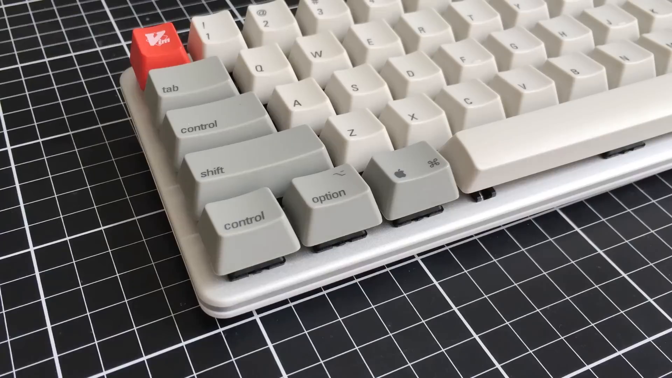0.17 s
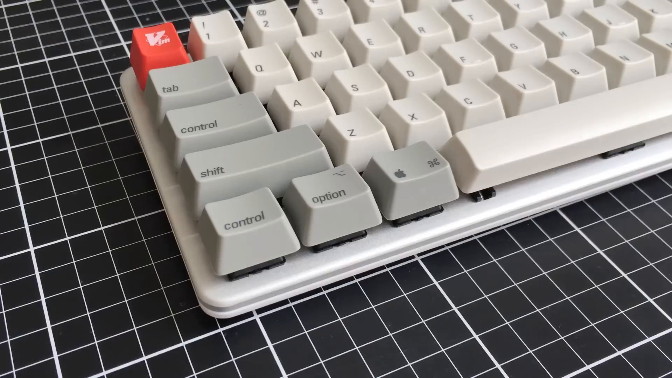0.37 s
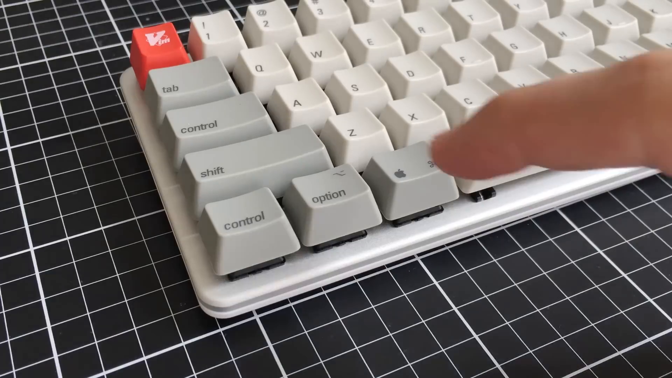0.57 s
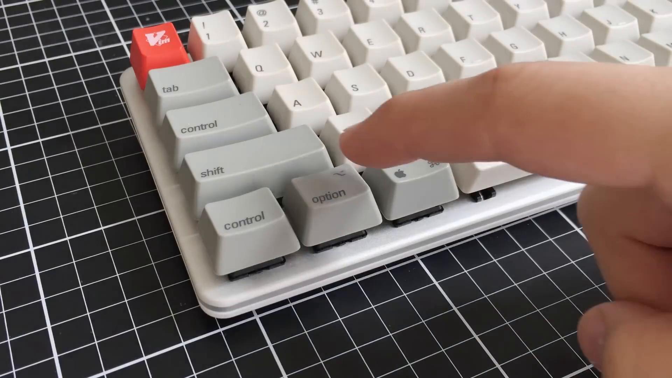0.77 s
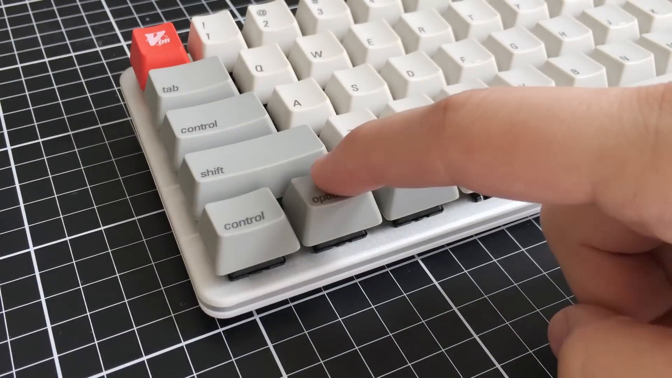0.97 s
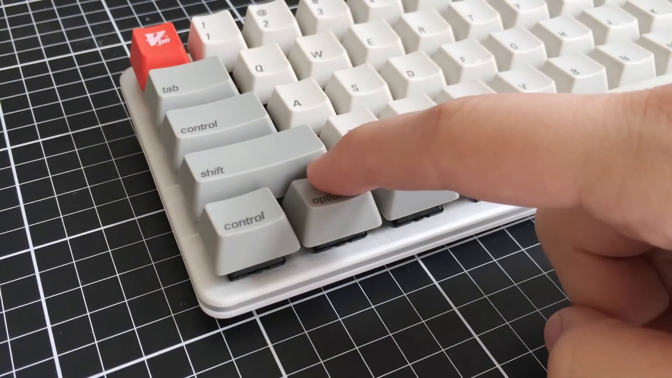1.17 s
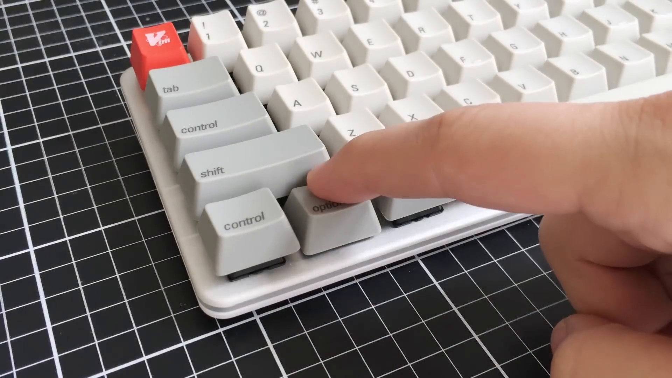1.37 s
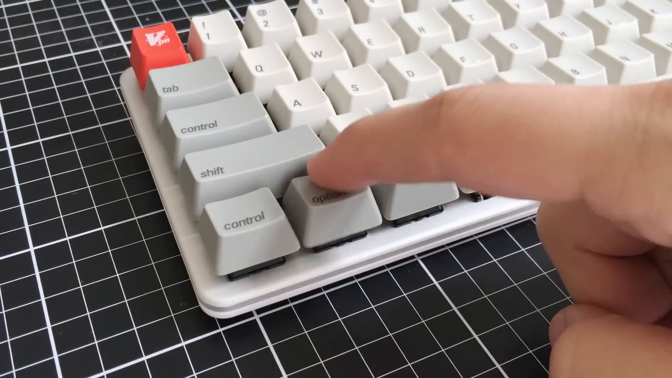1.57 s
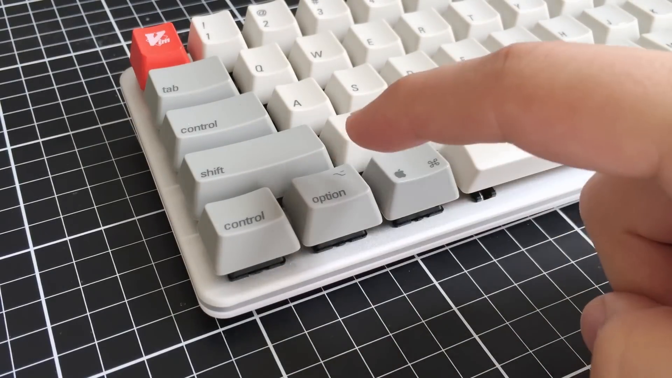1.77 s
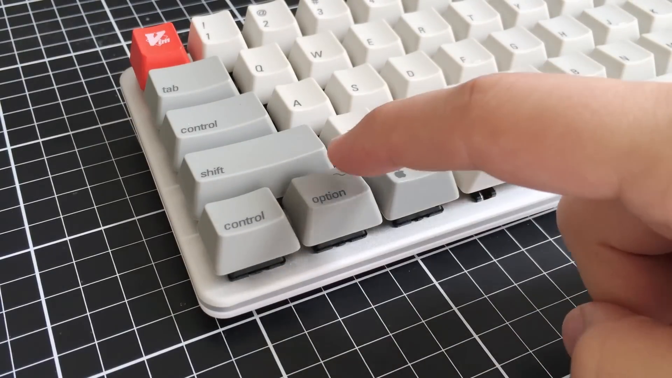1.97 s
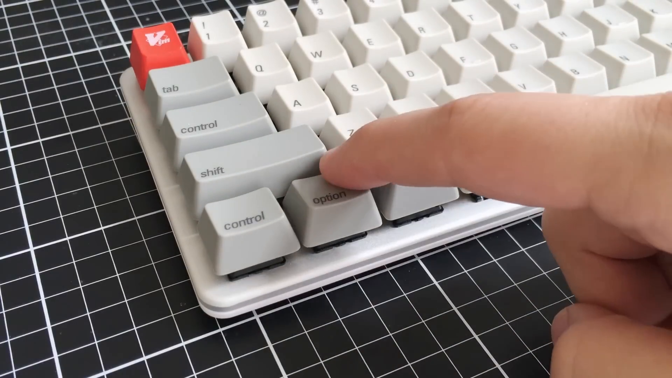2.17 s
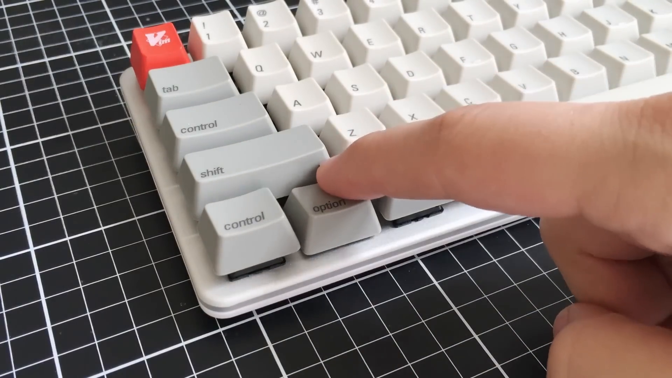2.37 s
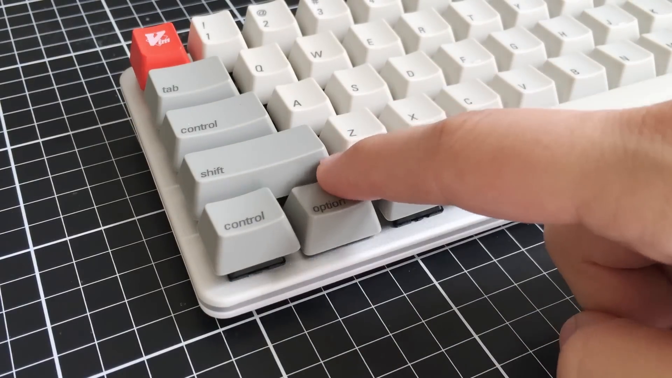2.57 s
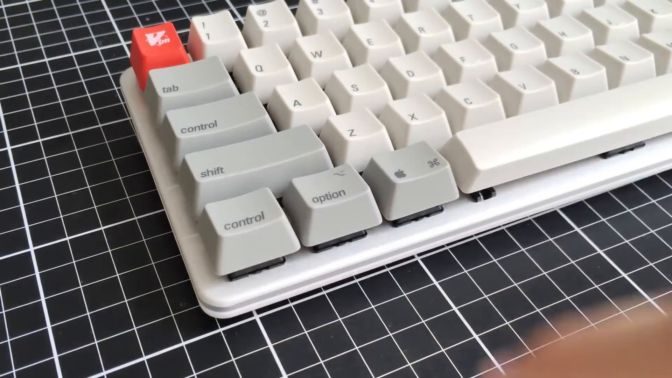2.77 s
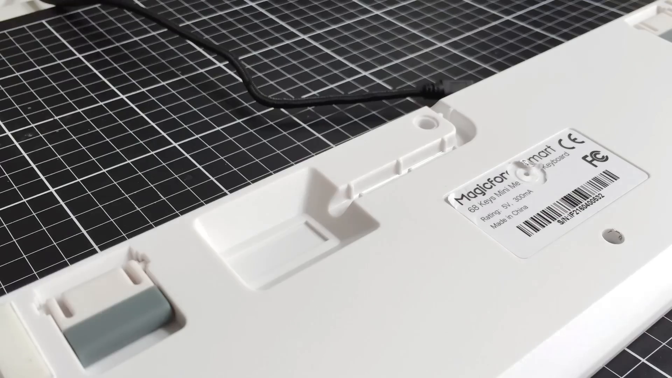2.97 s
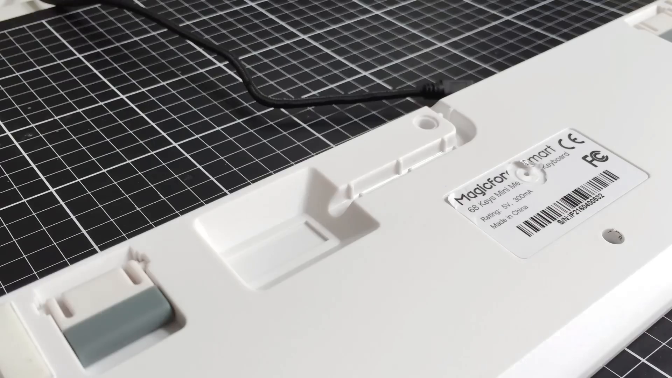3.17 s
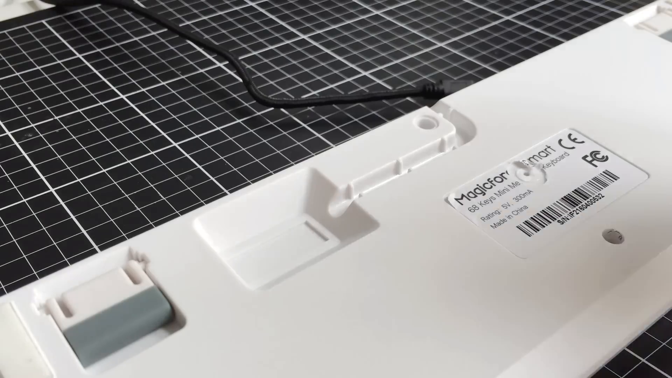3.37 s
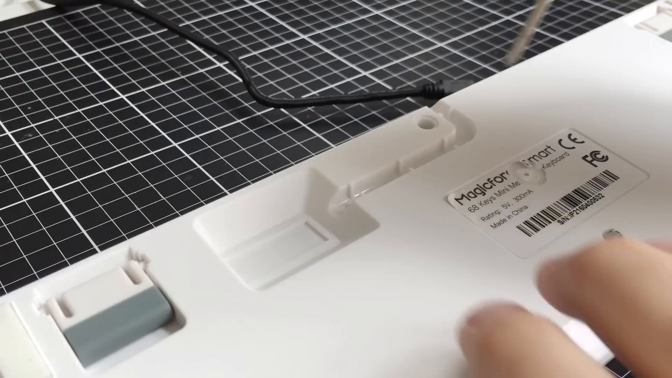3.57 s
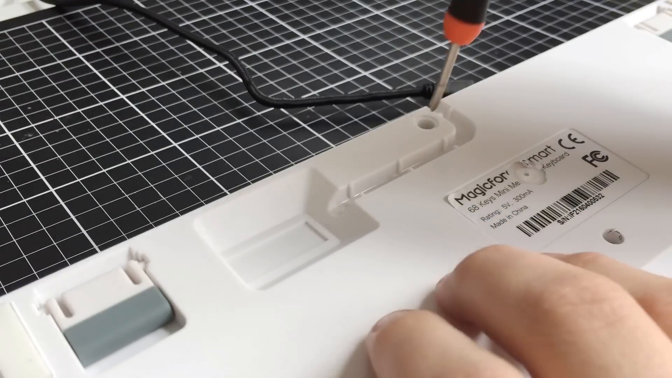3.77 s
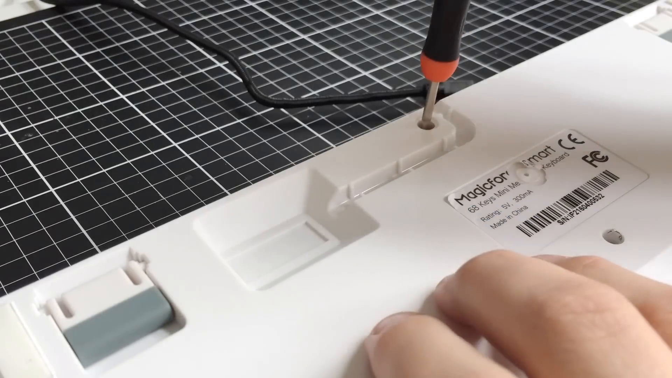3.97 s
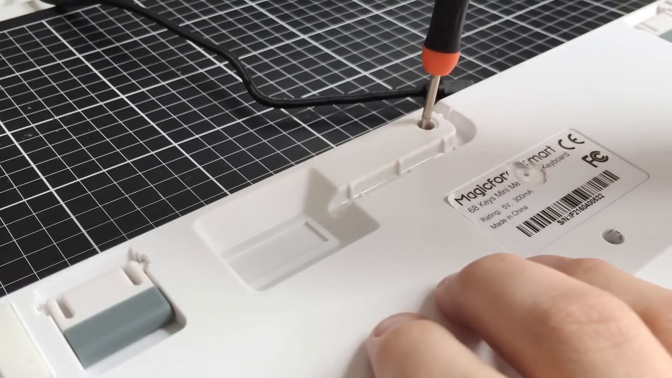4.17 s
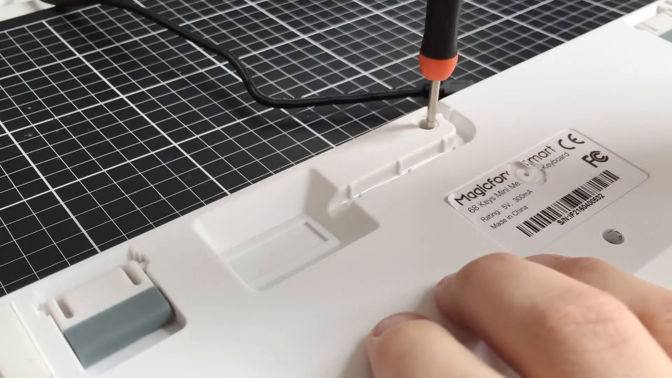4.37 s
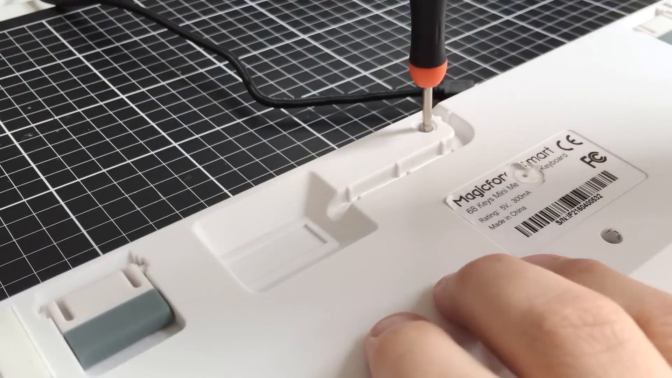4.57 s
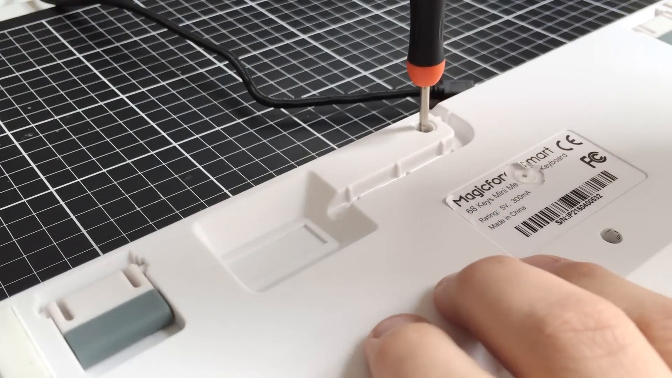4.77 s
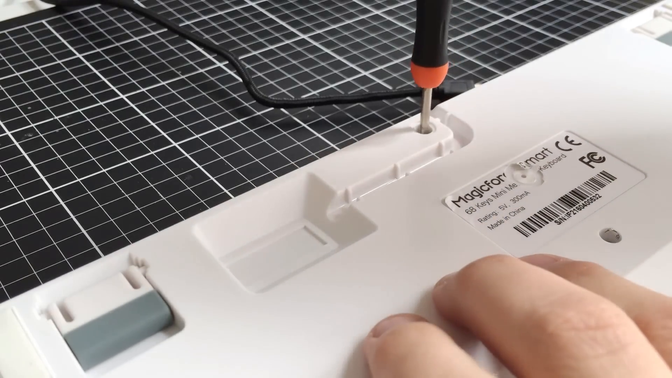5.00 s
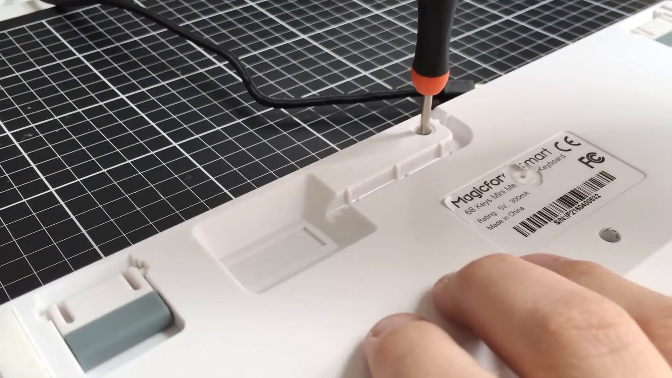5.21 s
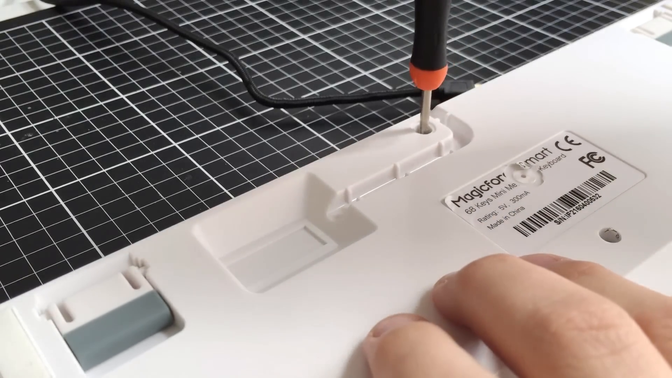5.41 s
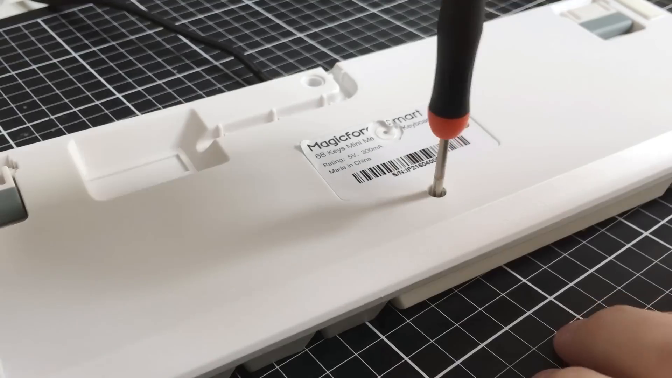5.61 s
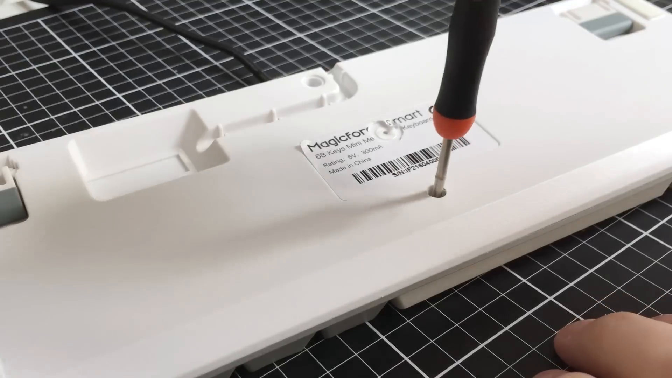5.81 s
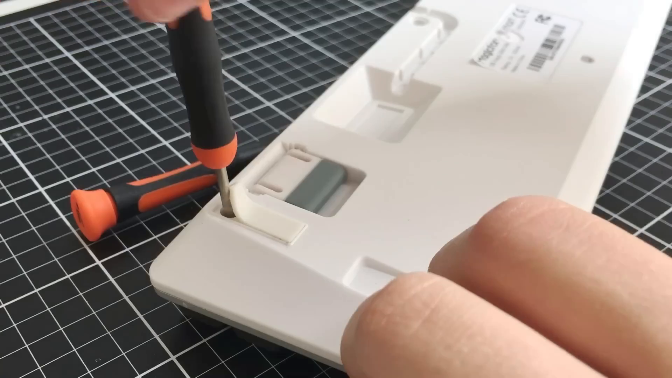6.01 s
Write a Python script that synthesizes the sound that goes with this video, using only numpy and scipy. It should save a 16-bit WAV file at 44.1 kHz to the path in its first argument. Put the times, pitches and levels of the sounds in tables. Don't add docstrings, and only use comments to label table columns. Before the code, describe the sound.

Two close, hard clacks of a plastic keyboard key with softer rattling releases, then a steel screwdriver knocking and grinding on a hollow plastic case.

```python
import sys
import numpy as np
from scipy import signal
from scipy.io import wavfile
from scipy.ndimage import uniform_filter1d

SR = 44100
rng = np.random.default_rng(int(sys.argv[2]) if len(sys.argv) > 2 else 0)


def gain_from_db(level_db):
    decades = np.asarray(level_db, float) / 20
    return 10 ** decades


def to_wav(s):
    ch = np.atleast_2d(s).T
    pcm = np.round(np.clip(ch, -1, 1) * 32767)
    wavfile.write(sys.argv[1], SR, pcm.astype(np.int16))


N = 266716


def evened(x):
    return x / np.sqrt(np.mean(x ** 2) + 1e-20)


def read(points, hz):
    f, value = np.transpose(points)
    return np.interp(np.log(hz + 1), np.log(f + 1), value)


def add(mix, start_s, sound):
    part = mix[round(start_s * SR):][:len(sound)]
    part += sound[:len(part)]


def rings(body, hollow_db, lows_db, highs_db, place, blur=1):
    hz, width_hz, db = np.transpose(body)[:, :, None]
    t = np.arange(1024) / SR
    colour_hz = [950, 1280, 2400, 5000]
    colour_db = np.interp(np.log(hz), np.log(colour_hz), [hollow_db, lows_db, 0, highs_db])
    sign = (-1) ** np.arange(len(body))[:, None]
    height = gain_from_db(db + colour_db + 1.5 * place) * width_hz * sign
    decay = np.exp(-np.pi * blur * width_hz * t)
    modes = height * decay * np.sin(2 * np.pi * hz * (1 + 0.008 * place) * t)
    return modes.sum(0) * np.exp(-(t / 0.009) ** 4)


def knocks(rows, body, crack_db, crack_hz, thin_hz):
    out, t = np.zeros((2, N)), np.arange(768) / SR
    chance = rng.standard_normal((len(rows), 3, 768))
    band = signal.butter(2, crack_hz, "bandpass", fs=SR)
    blow = np.array([0, 0, 0, 0, 0, 0, 0.2, 0.8, 0.2])
    snap = signal.lfilter(*band, t == 0)
    crack_fade = np.exp(-t / 0.00041) + 0.033 * np.exp(-t / 0.0026)
    for row, (contact, grit, place) in zip(rows, chance):
        start_s, peak_db, lows_db, highs_db, hollow_db, chatter_ms = row
        colour = hollow_db, lows_db, highs_db
        fade = np.exp(-t * 1000 / max(chatter_ms, 0.1)) * (1 - np.exp(-t / 0.00053))
        force = 0.03 * chatter_ms * contact ** 3 * fade
        add(force, 0, blow)
        ring = np.convolve(force, rings(body, *colour, place[:len(body), None]))
        ring /= abs(ring).max()
        crack = np.convolve(fade, crack_fade)[:768] * signal.lfilter(*band, grit)
        crack *= gain_from_db(crack_db + highs_db) / abs(crack).max()
        spread = np.convolve(blow, rings(body, *colour, 0, blur=2.6))
        spread *= np.linalg.norm(ring) / np.linalg.norm(spread)
        add(spread, 0, -snap * np.linalg.norm(crack) / np.linalg.norm(snap))
        add(ring, 0, crack)
        level = gain_from_db(peak_db) / abs(ring).max()
        add(out[0], start_s, level * ring)
        add(out[1], start_s, level * spread)
    return signal.lfilter(*signal.butter(3, thin_hz, "highpass", fs=SR), out)


# pitch_hz [Hz], width_hz [Hz], level_db [dB]
KEY_RINGS = [(240, 70, -0.5), (403, 110, -6.5), (904, 98, -1.5), (1278, 79, 6), (1681, 214, 2),
             (2340, 220, 6.5), (3210, 205, 4), (3820, 350, 0.5), (4502, 190, 1), (4540, 210, -2),
             (5690, 970, -5), (7060, 1300, -13), (9600, 160, -15.5), (12600, 770, -35.5),
             (13900, 450, -21.5)]
# start_s [s], peak_db [dB]
KEY_DOWN = [
    (1.459, -5.5),
    (2.5024, -6),
]
# delay_ms [ms], below_peak_db [dB], lows_db [dB], highs_db [dB], chatter_ms [ms]
DOWN_CONTACTS = [
    (-6.5, -21, -2.5, -2, 6),
    (0, -1, 2.5, 4, 1.09),
    (3, -12, -2, 2, 1.2),
    (7.5, -16.5, 3.5, -7.5, 1.02),
]


def press_key():
    hollow_db = 2
    rows = []
    for start_s, peak_db in KEY_DOWN:
        for delay_ms, db, lows_db, highs_db, chatter_ms in DOWN_CONTACTS:
            rows.append((start_s + delay_ms / 1000, peak_db + db, lows_db, highs_db, hollow_db, chatter_ms))
    return knocks(rows, KEY_RINGS, crack_db=-14.5, crack_hz=[2500, 14000], thin_hz=172)


# start_s [s], peak_db [dB], rebound_gap_ms [ms]
KEY_UP = [
    (1.7032, -20, 7.6),
    (2.7303, -17, 5.3),
]
UP_DELAYS = [-1, 0, 1.13, 1.95, 2.95]
# below_peak_db [dB], lows_db [dB], highs_db [dB], chatter_ms [ms]
UP_CONTACTS = [
    (-15.5, 1, -7.5, 4.8),
    (-0.3, -6, 4.5, 2.4),
    (-5, 5.5, 5, 1.76),
    (-12, 12.5, -5.5, 0.95),
    (-22, 15, -7, 1.11),
]
# start_s [s], peak_db [dB], lows_db [dB], highs_db [dB], chatter_ms [ms]
BRUSHES = [
    (1.163, -51.5, -2.5, 1, 0.6),
    (1.198, -41, 7, 7, 1.2),
    (1.1996, -33, 3.5, 7, 0.91),
    (1.2032, -38.5, 12, -1, 0.54),
    (1.208, -52.5, 2.5, 6, 5.2),
    (2.2696, -39, -0.5, -3, 5.3),
    (3.23, -44.5, -0.5, -1, 1.63),
]


def release_and_touch_key():
    release_hollow_db, touch_hollow_db = 2.5, -4.5
    rows = []
    for start_s, peak_db, lows_db, highs_db, chatter_ms in BRUSHES:
        rows.append((start_s, peak_db, lows_db, highs_db, touch_hollow_db, chatter_ms))
    for start_s, peak_db, gap_ms in KEY_UP:
        for delay, (db, lows_db, highs_db, chatter_ms) in zip(UP_DELAYS, UP_CONTACTS):
            contact_s = start_s + delay * gap_ms / 1000
            rows.append((contact_s, peak_db + db, lows_db, highs_db, release_hollow_db, chatter_ms))
    near, far = knocks(rows, KEY_RINGS, crack_db=-20, crack_hz=[2500, 14000], thin_hz=148.3)
    spring_hz, spring_width_hz = 9700, 700
    far = signal.lfilter(*signal.iirnotch(spring_hz, spring_hz / spring_width_hz, SR), far)
    return near, far


# pitch_hz [Hz], width_hz [Hz], level_db [dB]
CASE_RINGS = [(417, 130, -14.5), (745, 64, 6.5), (1014, 59, 9), (1373, 145, 6.5), (1896, 110, 2.5),
              (2477, 240, 0.5), (3280, 160, -1), (3647, 210, -1.5), (4313, 300, -8.5), (4770, 320, -10),
              (5760, 81, -13), (6210, 290, -15.5), (6860, 1300, -15.5), (9920, 590, -39),
              (12300, 790, -34.5), (15000, 900, -29)]
# start_s [s], peak_db [dB], lows_db [dB], highs_db [dB], hollow_db [dB]
TIP_SLIPS = [(4.0265, -12.5, 5.5, -1, 0.5), (4.0273, -7, 7, -1.1, -9.5), (4.4659, -12, -4, 7, 6),
             (4.4917, -36, -3.5, -3.5, -6), (4.495, -11, 15.5, 14.5, 13), (4.498, -5.5, 5.5, 20, 0.5),
             (4.502, -18.5, 2.1, -9.5, -10), (4.785, -6, 0.1, -2, -3.5), (4.859, -14, 6.5, 4.5, 9),
             (4.8615, -8, -14, 13, 7.5), (4.8642, -3, 2, -12, 0.1), (4.9754, -3.5, -2.5, 1.2, -5),
             (4.9905, -33, -8, 0.1, 19.5)]
# start_s [s], peak_db [dB], lows_db [dB], highs_db [dB], hollow_db [dB]
TIP_TICKS = [(5.147, -47, 10.5, 9, -19), (5.199, -47, 14, -10, 3.5), (5.22, -42.5, -8, 11, -6),
             (5.373, -53, 10.5, 10, -1.5), (5.436, -52, 12, 0.1, 14), (5.48, -45.5, 36, -9, 23),
             (5.4848, -34.5, 32, -13.5, 36), (5.572, -43, -23, -25, -18), (5.5794, -37, 11, -19, 15),
             (5.6543, -22.5, -6, -6, 8.5), (5.687, -47, -9, -6, -18), (5.716, -32.5, 4, -0.5, 0.5),
             (5.79, -50.5, -4, 0, -6.5), (5.914, -47.5, 8.5, -9, 11), (5.9402, -44.5, -20, -21.5, -15)]


def knock_case():
    rows = []
    for row in TIP_SLIPS + TIP_TICKS:
        peak_db = row[1]
        chatter_ms = min(0.061 - 0.19 * peak_db, 3.4)
        rows.append((*row, chatter_ms))
    return knocks(rows, CASE_RINGS, crack_db=-18, crack_hz=[4000, 13500], thin_hz=345)


def strokes(rows):
    depth_db = 25
    t, power = np.arange(N) / SR, 0
    for peak_s, rise_s, fall_s, *peaks_db in rows:
        away = np.maximum((peak_s - t) / max(rise_s, 0.003), (t - peak_s) / max(fall_s, 0.003))
        power = power + gain_from_db(2 * (np.array(peaks_db)[:, None] - depth_db * away))
    return np.sqrt(power)


# peak_s [s], build_up_s [s], release_s [s], dull_slips_db [dB], fine_grit_db [dB]
TIP_TWISTS = [(4.01, 0.026, 0.051, -54.5, -66.5), (4.1, 0.035, 0.27, -65, -62.5),
              (4.224, 0.21, 0.071, -45, -69), (4.33, .15, .03, -66, -78), (4.55, 0.034, 0.12, -54, -55),
              (4.636, 0.096, 0.021, -40, -58), (4.7, 0.11, 0.099, -60.5, -66),
              (5.04, .03, 0.19, -43.5, -55), (5.148, 0.032, 0.048, -43.5, -63),
              (5.218, 0.075, 0.074, -40.5, -59), (5.376, 0.014, 0.13, -47.5, -69.5),
              (5.582, 0.023, 0.0062, -36.5, -64), (5.64, 0.084, 0.053, -48.5, -69.5),
              (5.662, .008, 0.074, -46, -63), (5.718, 0.077, 0.031, -39, -54), (5.78, .1, 0.084, -64, -76),
              (5.94, 0.08, .1, -56.5, -69.5), (5.99, .05, 0.13, -59, -70.5)]


def scrape():
    dull, fine = strokes(TIP_TWISTS)
    wander = evened(uniform_filter1d(rng.standard_normal(N), size=900))
    jerk_count = np.cumsum(75 * gain_from_db(1.9 * wander)) / SR
    jerks = rng.standard_normal(N) * (0.76 + np.exp(-(jerk_count % 1) / 0.13))
    grit = rng.standard_normal(N) * gain_from_db(1.5 * rng.exponential(1, N))
    low_rings = rings(CASE_RINGS, hollow_db=11.0, lows_db=11.0, highs_db=-18.5, place=0)
    high_rings = rings(CASE_RINGS, hollow_db=-22.0, lows_db=-12.5, highs_db=5.5, place=0)
    low = evened(signal.oaconvolve(jerks, low_rings)[:N])
    high = evened(signal.oaconvolve(grit, high_rings)[:N])
    return gain_from_db(-4.5) * dull * low + gain_from_db(3.0) * fine * high


def shaped(tone, size, patchy_db, swell_db):
    frames, hz = 4 * N // size + 5, np.fft.rfftfreq(size, 1 / SR)
    a, b, patches = rng.standard_normal((frames, len(hz), 3)).T
    patches = uniform_filter1d(patches, 6, 0)
    patches = evened(uniform_filter1d(patches, 5, 1))
    swell = evened(uniform_filter1d(rng.standard_normal(frames), 9)) / (1 + hz[:, None] / 400)
    level_db = read(tone, hz)[:, None] + patchy_db * patches + swell_db * swell
    z = (a + 1j * b) * gain_from_db(level_db)
    return evened(signal.istft(z, nperseg=size, noverlap=3 * size // 4)[1][:N])


# peak_s [s], build_up_s [s], release_s [s], level_db [dB]
FINGER_SLIDES = [(4.164, .2, .07, -80), (4.238, .02, 0.048, -72.5), (5.246, 0.35, 0.065, -72),
                 (5.4, .15, .15, -84), (5.536, 0.027, 0.094, -61), (5.66, 0.026, 0.048, -72),
                 (5.71, 0.086, .12, -65), (5.86, .027, .033, -63), (6.04, 0.32, .1, -71.5)]
# pitch_hz [Hz], level_db [dB]
SKIN_TONE = [(2000, -22), (6000, -9), (9000, -4), (12000, -2), (15000, 0), (17000, 0)]


def slide():
    hiss = shaped(SKIN_TONE, size=256, patchy_db=1.5, swell_db=0)
    return gain_from_db(-1.5) * strokes(FINGER_SLIDES)[0] * hiss


# start_s [s], deep_db [dB], upper_db [dB]
DESK_BOOMS = [(1.46, -34.5, -46.5), (1.704, -53, -48), (2.504, -34.5, -42.5), (2.732, -50, -75),
              (4.028, -50, -45), (4.501, -61, -50.5), (4.866, -49.5, -44), (4.99, -45, -37),
              (5.376, -47, -49), (5.549, -41.5, -58.5), (5.656, -53, -41.5), (5.735, -41.5, -51.5),
              (5.858, -49.5, -67)]
# pitch_hz [Hz], level_db [dB], time_to_fall_60_db_s [s]
DESK_TONES = [(71.5, -2, 0.34), (98.7, -1.5, .45), (162.8, -0.5, 0.57), (228.3, -2, 0.45), (307, -2, 0.15)]


def desk():
    out, t = np.zeros(N), np.arange(SR // 2) / SR
    hz, db, t60_s = np.transpose(DESK_TONES)[:, :, None]
    upper = np.arange(len(DESK_TONES))[:, None] >= 2
    places = rng.standard_normal((len(DESK_BOOMS), len(DESK_TONES), 1))
    for (start_s, deep_db, upper_db), place in zip(DESK_BOOMS, places):
        level_db = np.where(upper, upper_db, deep_db) + db - 60 * t / t60_s
        modes = gain_from_db(level_db) * np.sin(2 * np.pi * hz * (1 + 0.037 * place) * t)
        add(out, start_s, modes.sum(0) * (1 - np.exp(-t / 0.0032)))
    return out


# pitch_hz [Hz], time_to_fall_60_db_s [s]
ROOM_FADE = [(100, 0.94), (300, 0.5), (800, 0.38), (2000, 0.71), (5000, 0.63), (12000, .4)]
# delay_s [s], level_db [dB]
WALL_ECHOES = [(0.0148, -16), (0.0312, -33), (0.042, -31), (.068, -32)]


def room(x, echoes_db, tail_db, colour):
    taps = np.zeros(SR)
    at = np.arange(0, SR - 10, 10) + rng.integers(0, 10, (SR - 1) // 10)
    taps[at] = rng.choice([-1., 1.], len(at))
    hz, t, z = signal.stft(taps, SR, nperseg=256)
    fade = gain_from_db(-60 * t / read(ROOM_FADE, hz)[:, None])
    tail = signal.istft(z * fade, SR, nperseg=256)[1][:SR]
    tail *= np.clip((np.arange(SR) / SR - 0.004) / 0.0035, 0, 1)
    tail *= gain_from_db(tail_db) / np.linalg.norm(tail)
    for delay_s, db in WALL_ECHOES:
        scattered = taps[round(delay_s * SR):][:150] * np.exp(-np.arange(150) / 45.)
        add(tail, delay_s, gain_from_db(db + echoes_db) * scattered / np.linalg.norm(scattered))
    grid_hz = np.linspace(0, SR / 2, 1025)
    wall_top_hz = 15900
    tone = signal.firwin2(1025, grid_hz, gain_from_db(read(colour, grid_hz)) * (grid_hz < wall_top_hz), fs=SR)
    return signal.fftconvolve(x, signal.convolve(tail, tone)[512:])[:N]


# time_s [s], level_db [dB]
RUMBLE_DRIFT = [(0, -1.3), (1.199, 2), (2.9, -0.2), (3.0, 0.7), (4, 2.4), (5, 4), (6.05, 7)]
# pitch_hz [Hz], level_db [dB per Hz]
RUMBLE_TONE = [(16, -39), (28, -7.5), (49, -2), (64, -2.5), (86, -13), (119, -1), (172, -10), (215, -1),
               (270, -10), (350, -23), (420, -19.5), (550, -51.5), (920, -120)]
# pitch_hz [Hz], level_db [dB per Hz]
HISS_TONE = [(220, -32), (380, -5.5), (630, -3.5), (671, -3), (726, -6.5), (979, -2.5), (1500, -7.5),
             (1930, -11.5), (2300, -14), (4820, -20.5), (11800, -27.5), (15200, -30.5), (16500, -44.5)]


def air():
    rumble_db, hiss_db = -57, -66.5
    time_s, drift_db = np.transpose(RUMBLE_DRIFT)
    rumble_gain = gain_from_db(rumble_db + np.interp(np.arange(N) / SR, time_s, drift_db))
    rumble = rumble_gain * shaped(RUMBLE_TONE, size=2048, patchy_db=1.9, swell_db=3.5)
    hiss = gain_from_db(hiss_db) * shaped(HISS_TONE, size=1024, patchy_db=0.4, swell_db=0.3)
    return rumble + hiss


KEY_WALLS = -0.75, -15.5, [(300, 11.5), (1000, 1.5), (2300, 2.5), (5600, -2), (9100, -2), (9700, 6.5),
             (10300, -7), (16000, -5.5)]
CASE_WALLS = -8.5, -17, [(300, 7.5), (620, 0), (735, 6.5), (860, -1.5), (1300, -0.5), (2500, 1),
              (5000, 0.5), (10000, -2.5), (15500, 3.5)]


def scene():
    down, down_far = press_key()
    up, up_far = release_and_touch_key()
    case, case_far = knock_case()
    rubs = scrape() + slide()
    walls = room(down_far + up_far, *KEY_WALLS) + room(case_far + rubs, *CASE_WALLS)
    return (down + up + case + rubs + walls + desk() + air())[None]


# from_s [s], to_s [s]
SILENCES = [
    (0, .1),
    (2.949, 2.974),
]


def silences():
    t, open_gain = np.arange(N) / SR, np.ones(N)
    for from_s, to_s in SILENCES:
        open_gain *= (t < from_s) | (t > to_s)
    return uniform_filter1d(open_gain, size=24)


def band_limit(x):
    return signal.sosfilt(signal.butter(12, 17010, fs=SR, output="sos"), x)


def record(dry):
    bass_cut = signal.butter(3, 42, "highpass", fs=SR, output="sos")
    top_cut = signal.firwin(255, 16600, window=("kaiser", 9), fs=SR)
    heard = signal.sosfilt(bass_cut, dry)
    heard = signal.oaconvolve(heard, top_cut[None], "same")
    return band_limit(heard * silences())


dry = scene()
out = record(dry)
to_wav(out)
```